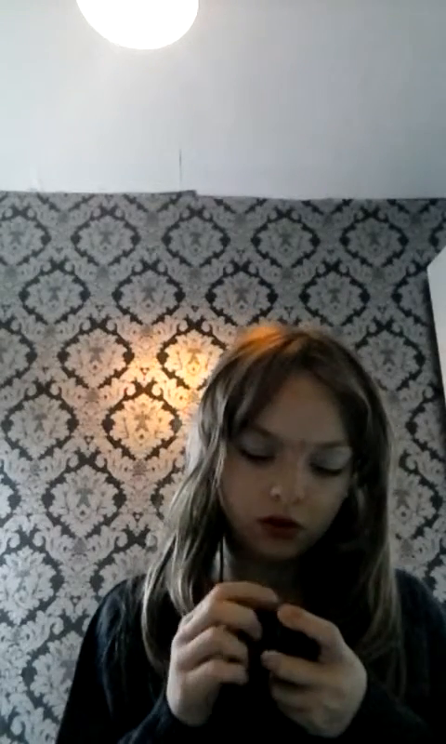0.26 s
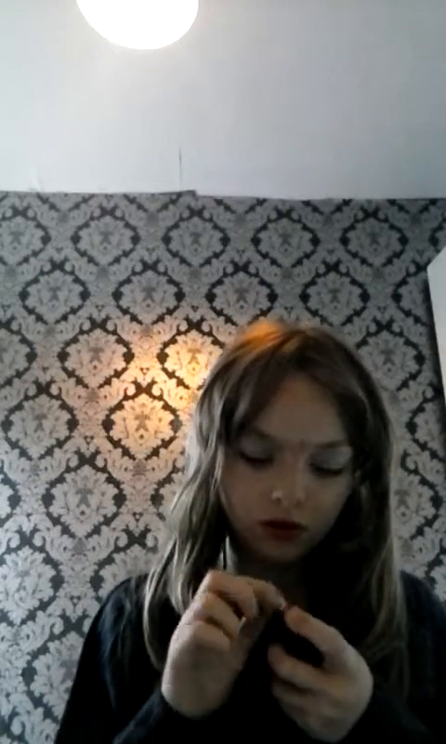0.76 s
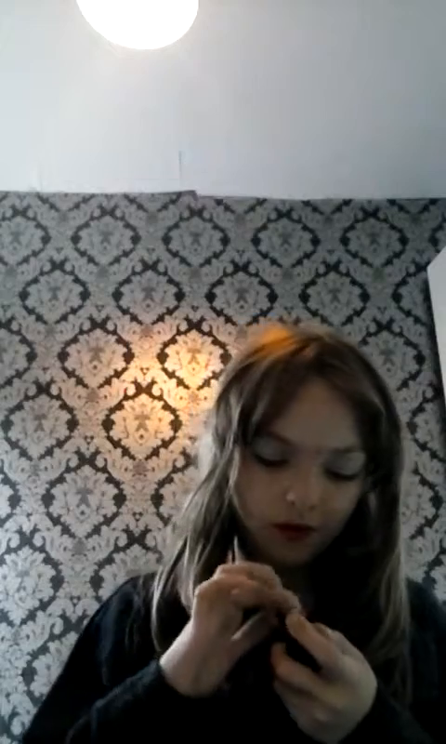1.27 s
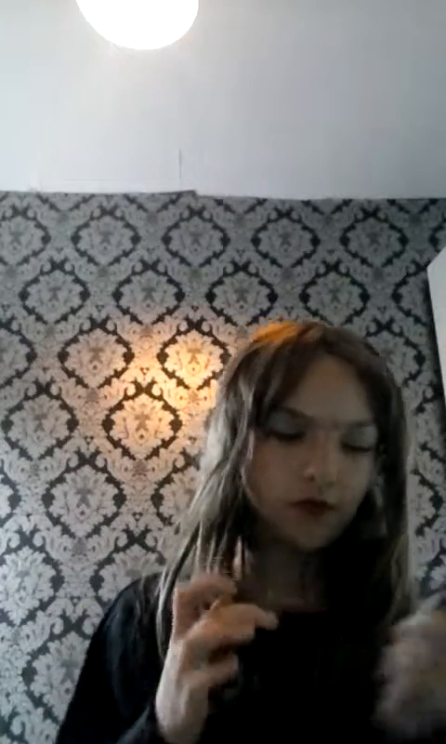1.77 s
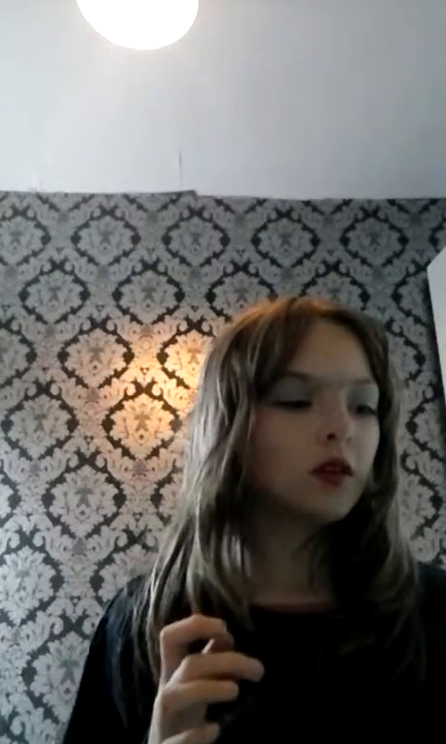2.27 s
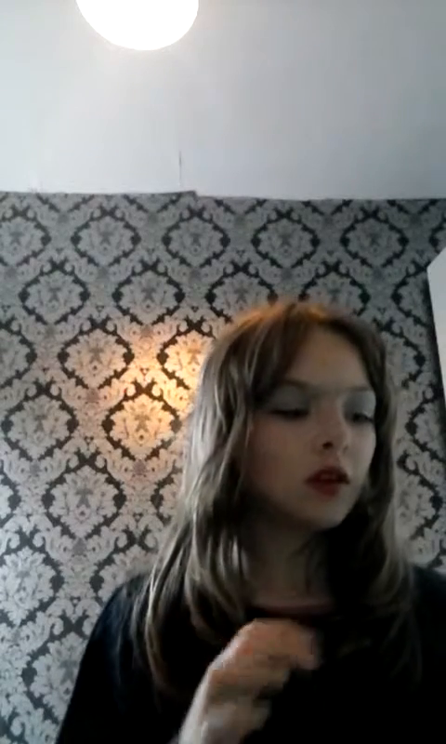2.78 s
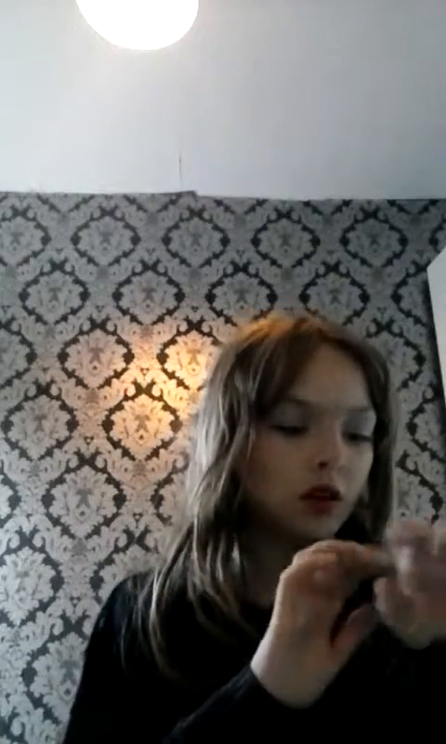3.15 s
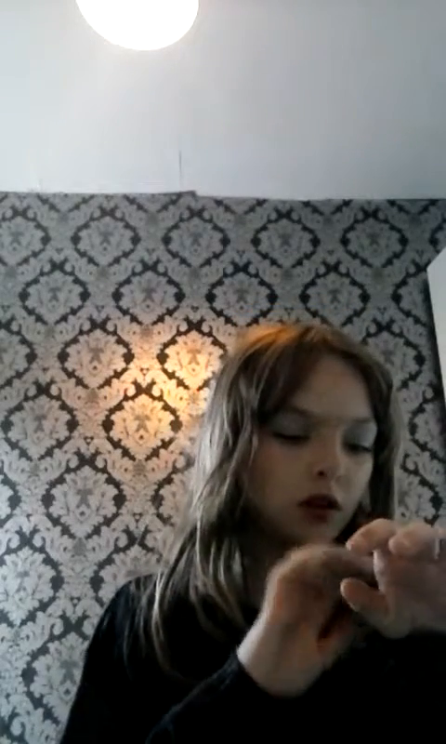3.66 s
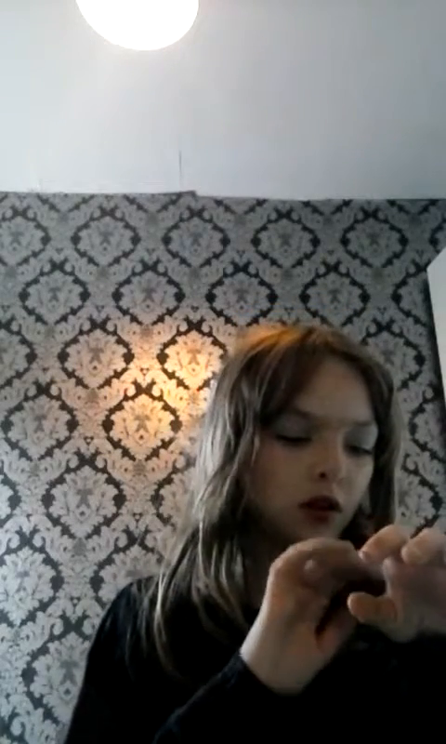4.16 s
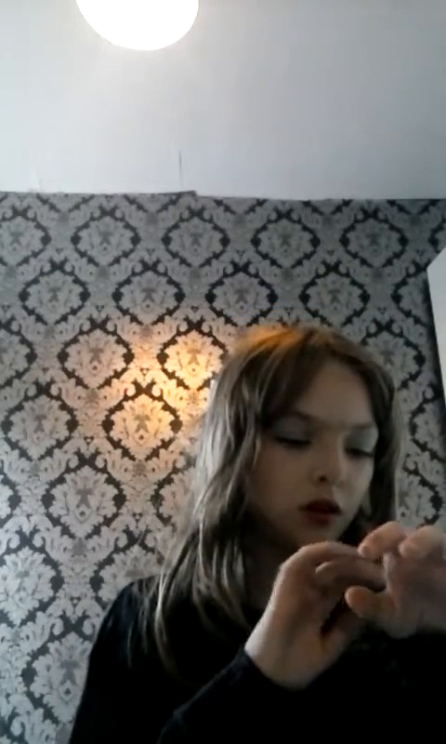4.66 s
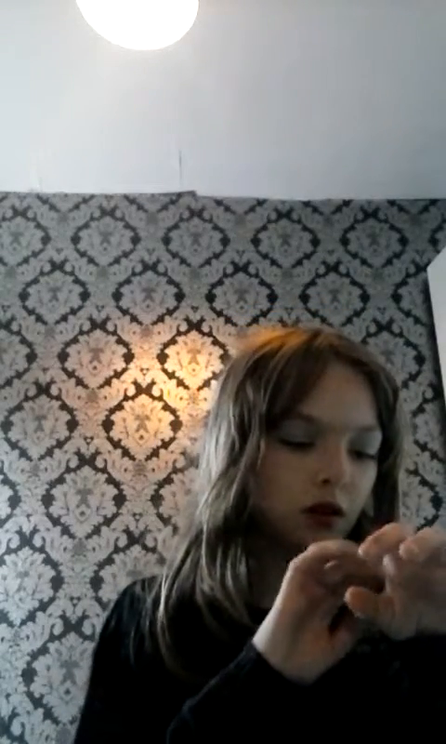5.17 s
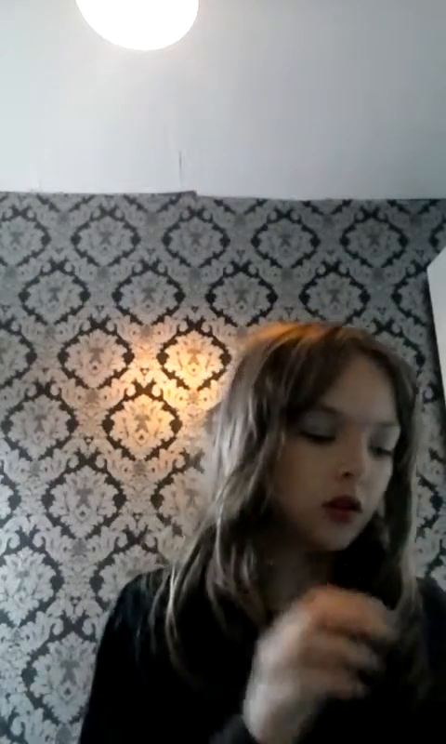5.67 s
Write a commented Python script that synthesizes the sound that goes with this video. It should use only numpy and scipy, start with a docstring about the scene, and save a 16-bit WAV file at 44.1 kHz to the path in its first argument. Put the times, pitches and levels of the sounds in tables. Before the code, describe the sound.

A girl handles a small makeup container near the microphone indoors. Mostly near-silence with wavering low hum and a thin, rapidly pulsing hiss. Just past two seconds, a bright hard crack with a woody, boxy body and brief room reflections, followed by a softer cluster of fumbling clicks, bumps and skin sliding on the table. The rest is faint hum and hiss with low rumble.

```python
"""Indoors, close to the microphone: a small hard case is put down hard on a hollow table top.
Finger swishes and a faint knock come first; soon after, a hand fumbles and picks something up.
Blows and contacts ring banks of decaying modes and excite noise reflections; the sliding hand is noise.
Underneath lie dull air noise, a wavering mains hum, low rumble swells and a treble hiss in quick bursts."""
import sys
import numpy as np
from scipy import signal
from scipy.fft import rfft, irfft
from scipy.io import wavfile

SR = 44100
rng = np.random.default_rng(int(sys.argv[2]) if len(sys.argv) > 2 else 0)


def pcm_store(signal):
    """Save signal as 16-bit PCM."""
    levels = np.round(np.clip(np.atleast_2d(signal), -1, 1) * 32767)
    wavfile.write(sys.argv[1], SR, levels.astype(np.int16).T)


N = 261954  # samples

# Modes of a hard edge, rung by the case and by the fumbling hand: (f/Hz, level/dB, t60/s)
EDGE_MODES = [(1890, -3.5, 0.008), (2270, -6.5, 0.0052), (2619, -1.5, 0.013), (3450, -3.5, 0.0055),
              (4550, -3.5, 0.0033), (4930, -11.5, 0.0018), (6470, -1, 0.0015), (7496, -8, 0.0019),
              (9087, -16, .005), (11200, -15, 0.0014)]


def from_db(db):
    """Decibels to gain."""
    return 10 ** (np.asarray(db) / 20)


def rms_one(x):
    """Scales to rms 1."""
    return x / np.sqrt(np.mean(x ** 2) + 1e-20)


def in_time(rows):
    """Columns of a curve table, interpolated at every sample."""
    s, *columns = np.transpose(rows)
    return [np.interp(np.arange(N) / SR, s, column) for column in columns]


def at_hz(points, hz):
    """A table over frequency, read on a log-frequency axis."""
    table_hz, values = np.array(points).T
    return np.interp(np.log(hz), np.log(table_hz), values)


def drift(rate_hz):
    """Slow random wander of rms about 1: noise through two equal low-pass poles at rate_hz."""
    step = 40  # samples per slow value
    r = np.exp(-2 * np.pi * step * rate_hz / SR)
    settle = 2000  # slow values dropped while the filter settles
    noise = rng.standard_normal(N // step + settle + 2)
    slow = signal.lfilter([1], [1, -2 * r, r * r], noise)[settle:]
    return np.interp(np.arange(N) / step, np.arange(len(slow)), rms_one(slow))


def band(x, low_hz, high_hz):
    """Second-order Butterworth band-pass."""
    return signal.sosfilt(signal.butter(2, [low_hz, high_hz], "band", fs=SR, output="sos"), x)


def noise_band(low_hz, high_hz):
    """Band-passed noise, rms 1."""
    return rms_one(band(rng.standard_normal(N), low_hz, high_hz))


def coloured(spectrum):
    """Noise of the given spectrum, silent outside the table's range, rms 1."""
    hz = np.maximum(np.fft.rfftfreq(N, 1 / SR), 1)
    inside = (hz >= spectrum[0][0]) & (hz <= spectrum[-1][0])
    shaped = rfft(rng.standard_normal(N)) * from_db(at_hz(spectrum, hz)) * inside
    return rms_one(irfft(shaped, N))


def soft(seconds):
    """Touch with a rounded push of this length; longer pushes excite less treble."""
    push = np.hanning(round(seconds * SR) + 2)
    return lambda clicks: signal.fftconvolve(clicks, push / push.sum())[:N]


def scuff(seconds):
    """Touch with a short drag: a noise force that falls 20 dB in this time."""
    fall = from_db(-20 * np.arange(SR // 20) / SR / seconds)
    fall = fall / np.sqrt(np.sum(fall ** 2))
    return lambda clicks: signal.fftconvolve(clicks, fall)[:N] * rng.standard_normal(N)


def struck(table, column, modes, spread_db, touch):
    """Each contact's force, shaped by touch, rings every mode as a decaying resonator, unevenly."""
    rows = np.array(table)
    at = np.round(rows[:, 0] * SR).astype(int)
    out = np.zeros(N)
    chance = rng.standard_normal((len(at), len(modes)))
    shared = np.sqrt(np.sum(from_db(np.array(modes)[:, 1]) ** 2))  # the modes share the blow
    for k, (hz, mode_db, t60) in enumerate(modes):
        clicks = np.full(N, 1e-18)  # tiny floor instead of exact zeros
        clicks[at] = -from_db(rows[:, column] + mode_db + spread_db * chance[:, k]) / shared
        r = from_db(-60 / (t60 * SR))  # decay per sample
        w = 2 * np.pi * hz / SR
        out += signal.lfilter([0, np.sin(w)], [1, -2 * r * np.cos(w), r * r], touch(clicks))
    return out


def air(air_db):
    """Dull room noise, its upper part patchy, with a few narrow bands that come and go."""
    # Spectrum of the room air: (f/Hz, relative level per Hz/dB)
    air_spectrum = [(69, -35.5), (118, -3), (124, -0.5), (277, -5.5), (364, -12), (479, -8.5), (805, -13.5),
                    (923, -15.5), (1800, -19.5), (4500, -28), (5850, -61), (9900, -120)]
    # Faint narrow bands in the air: (f/Hz, width/Hz, level against the dull noise/dB)
    air_tones = [(276, 11, -12), (487.6, 15, -13), (913, 50, -11), (1016.3, 44, -14)]
    patchy_db = 2
    patches, tones = np.zeros(N), np.zeros(N)
    for hz, width, db in air_tones:
        tones += from_db(db + 2.2 * drift(1.5)) * noise_band(hz - width / 2, hz + width / 2)
    dull = coloured(air_spectrum)
    for low in (500, 800, 1280, 2050):
        change = from_db(patchy_db * drift(2.5)) - 1
        patches += change * band(dull, low, 1.6 * low)
    return from_db(air_db + 0.4 * drift(1.5)) * (dull + patches + tones)


def hum():
    """Mains hum: one sine whose level and phase waver."""
    # Level curve of the hum before its waver: (t/s, rms level/dB)
    hum_levels = [(0, -68), (.7, -71), (1.0, -60.5), (1.55, -68), (2.1, -62.5), (3.55, -69.5), (4.2, -67.5),
                  (4.65, -71), (5.4, -66.5), (5.94, -71.5)]
    hum_hz, waver_db = 99.4, 2.5
    hum_db, = in_time(hum_levels)
    level = np.sqrt(2) * from_db(hum_db + waver_db * drift(2.04))  # rms to peak
    phase = 2 * np.pi * hum_hz * np.arange(N) / SR + 1.1 * drift(6.8)
    return level * np.sin(phase)


def rumble():
    """Lumpy swells of noise, mostly below the hum, over a steady deep floor."""
    # Swells of low rumble: (peak t/s, width between 1/e points/s, peak level before the lumps/dB)
    swell_rows = [(.62, 0.19, -74), (0.882, 0.16, -75), (1.408, .45, -69), (1.76, 0.13, -84),
                  (2.117, 0.92, -64.5), (3.176, 0.2, -52), (4.243, 0.54, -64.5), (4.764, 0.33, -67.5),
                  (5.403, 0.47, -75.5)]
    floor_db = -79
    t = np.arange(N) / SR
    swell = sum(from_db(db) * np.exp(-(2 * (t - s) / length) ** 2) for s, length, db in swell_rows)
    lumpy = swell * from_db(2 * drift(4)) * noise_band(50, 85)
    return lumpy + from_db(floor_db) * noise_band(30, 77)


def hiss(hiss_db):
    """Steady treble hiss that jumps up in short, almost regular bursts of uneven height."""
    # Spectrum of the hiss: (f/Hz, relative level per Hz/dB)
    hiss_spectrum = [(2060, -39.5), (3500, -29), (4160, -22), (5700, -14), (6560, -7.5), (8530, 0),
                     (9820, -10.5), (11200, -7), (12800, -11.5), (14200, -11), (16200, -19)]
    bursts_per_s, rate_wander, jitter_cycles = 41, .15, 0.21
    burst_s, burst_db, spread_db = .008, 5, 1.5  # height before the colouring
    per_s = bursts_per_s * (1 + rate_wander * drift(2.6))
    cycle = np.floor(np.cumsum(per_s) / SR + jitter_cycles * drift(5)).astype(int)
    starts = np.diff(cycle, prepend=0) > 0
    height = starts * from_db(burst_db + spread_db * rng.standard_normal(N))
    gate = signal.fftconvolve(height, signal.windows.tukey(round(burst_s * SR), .3))[:N]
    focused = band(gate * coloured(hiss_spectrum), 6500, 9300)
    wide = from_db(-4.0) * gate * coloured(hiss_spectrum)
    return from_db(hiss_db) * (coloured(hiss_spectrum) + focused + wide)


def swishes():
    """Faint finger swishes: narrow puffs of noise that start quickly and trail off."""
    # Puffs: (t/s, length/s, f/Hz, level at the height of the puff/dB)
    swish_rows = [(1.345, .11, 6200, -74), (1.672, .05, 5600, -71.5), (1.7, .08, 6400, -73),
                  (1.686, .014, 2600, -77), (1.9, .16, 6300, -75), (1.968, .018, 2800, -75)]
    out = np.zeros(N)
    for s, length, hz, level_db in swish_rows:
        noise = rms_one(band(rng.standard_normal(SR // 4), hz * .93, hz * 1.09))
        puff = noise[:round(length * SR)]
        along = np.linspace(0, 1, len(puff))
        swell = np.sin(np.pi * np.sqrt(along))  # fullest a quarter of the way in
        out[round(s * SR):][:len(puff)] += from_db(level_db) * puff * swell
    return out


def contacts():
    """Fumbling: each contact thuds the table top, knocks small things and ticks an edge."""
    # Contacts, drive before modes and filters: (t/s, thud level/dB, knock level/dB, edge tick level/dB)
    contact_rows = [(2.188, -83.5, -48, -64), (2.65, -58, -52.5, -80), (2.677, -41, -47, -80),
                    (2.722, -22.5, -37.5, -69), (2.746, -14, -32.5, -31), (2.749, -14.5, -17, -41.5),
                    (2.768, -46, -56, -36.5), (2.798, -60, -31.5, -40), (2.818, -48, -55, -54),
                    (2.836, -34, -55, -45), (2.853, -14, -20, -40), (2.937, -34, -47, -57),
                    (2.949, -15, -21, -40.5), (2.976, -34, -61, -51.5), (3.017, -64, -62, -45),
                    (3.028, -12, -27.5, -49.5), (3.087, -28, -34, -59), (3.099, -33, -26.5, -43.5),
                    (3.117, -18, -41, -55.5), (3.139, -48, -34, -49), (3.156, -16.5, -39.5, -57),
                    (3.172, -46, -44, -41.5), (3.207, -43, -64, -65), (3.247, -42, -48, -72)]
    # Modes of the table top: (f/Hz, level/dB, t60/s)
    thud_modes = [(109, -9, 0.055), (153.7, -11.5, 0.18), (187.2, 1, 0.083), (194, 1.5, 0.0048),
                  (242.1, -21, 0.11)]
    # Modes of the small things in the hand: (f/Hz, level/dB, t60/s)
    knock_modes = [(353, -3.5, 0.019), (444.5, -1, .02), (520, -2.5, .022), (630, -2.5, .018),
                   (730, -1, 0.03), (810, -6, 0.042), (954.5, -4.5, .014), (1218, -7, 0.031),
                   (1510, -22, 0.015)]
    tap, drag = soft(0.00034), scuff(0.0053)

    def tap_and_drag(clicks):
        """A knock is part clean tap, part drag."""
        return from_db(-3) * tap(clicks) + from_db(-3.5) * drag(clicks)

    thud = struck(contact_rows, 1, thud_modes, spread_db=3.5, touch=soft(0.00275))
    knock = struck(contact_rows, 2, knock_modes, spread_db=3.5, touch=tap_and_drag)
    tick = struck(contact_rows, 3, EDGE_MODES, spread_db=4.0, touch=scuff(0.0083))
    thud = band(band(thud, 80, 900), 110, 1500)
    knock = band(band(knock, 280, 1600), 200, 2200)
    return thud + knock + band(tick, 2300, 7800)


def crack():
    """First broadband crack of the landing: bright noise that dies within milliseconds."""
    # Crack: (t/s, starting level before the band-pass/dB, t60/s)
    crack_row = (2.3229, -8.5, 0.001625)
    s, start_db, t60 = crack_row
    t = np.arange(N) / SR - s
    fall = (t > 0) * from_db(start_db - 60 * np.maximum(t, 0) / t60)
    return band(rng.standard_normal(N) * fall, 700, 12000)


def case_landing():
    """The case lands and rebounds: furniture booms, case and shelf ring, a dragged edge ticks."""
    # Blows, drive before modes and filters: (t/s, boom level/dB, body level/dB, edge tick level/dB)
    blows = [(2.3226, -14.5, -4.5, -6.5), (2.3268, -12.5, -1.5, -13), (2.3345, -12, -4.5, -19),
             (2.343, -16.5, -14, -21), (2.381, -19, -31, -31)]
    # Modes of the furniture under the blow: (f/Hz, level/dB, t60/s)
    boom_modes = [(60.04, -7.5, 0.097), (114, -3, 0.17), (145, 2.5, 0.083), (222, -3.5, 0.0608)]
    # Modes of case and shelf: (f/Hz, level/dB, t60/s)
    body_modes = [(342, -4.5, 0.18), (407, -2.5, 0.13), (434, -21, 0.39), (468, -8, 0.19),
                  (616, 4.5, 0.086), (600, -18, 0.37), (690, -3, 0.064), (800.4, -1, 0.066),
                  (865, 9, 0.041), (966, -3, 0.18), (1041.4, -8.5, .05), (1138, -5.5, .05),
                  (1230, -7, 0.034), (1385, -11.5, 0.014), (1529.5, -9, 0.043), (1963, -9.5, 0.046)]
    boom = struck(blows, 1, boom_modes, spread_db=-2.0, touch=soft(0.0048))
    body = struck(blows, 2, body_modes, spread_db=4.0, touch=soft(.0003))
    tick = struck(blows, 3, EDGE_MODES, spread_db=-1.0, touch=scuff(.012))
    return band(boom, 43, 875) + band(body, 260, 2000) + band(tick, 1000, 15000) + crack()


def room(x):
    """Dense reflections: half-octave bands of noise, each dying at its own rate."""
    # Decay of the room: (f/Hz, t60/s)
    room_decay = [(100, 0.2), (260, 0.31), (600, 0.26), (1100, 0.28), (2000, 0.21), (4000, 0.29),
                  (7000, .16), (12800, .08)]
    rise_s = 0.00081
    t = np.arange(SR // 2) / SR
    edges = 90 * 2 ** np.arange(0, 7.6, .5)
    tail = np.zeros(len(t))
    for low, high in zip(edges, edges[1:]):
        t60 = at_hz(room_decay, np.sqrt(low * high))
        tail += band(rng.standard_normal(len(t)), low, high) * from_db(-60 * t / t60)
    tail *= 1 - np.exp(-t / rise_s)
    return signal.fftconvolve(x, tail / np.sqrt(np.sum(tail ** 2)))[:N]


def rustle():
    """Lumpy noise of skin and cloth sliding on the table: fades in, presses harder, lifts off."""
    start_s, full_s, lift_s, end_s = 2.64, 2.75, 3.202, 3.393
    low_db, mid_db = -52.5, -66.5  # before fades, push and lumps
    press_db, edge_db = 11, -21.5  # rise until the lift, fade at both ends
    shape_db, push_db = in_time([(start_s - .02, -80, 0), (start_s, edge_db, 0), (full_s, 0, 0),
                                 (lift_s, 0, press_db), (end_s, edge_db, 0), (end_s + .03, -80, 0)])
    lumps_db = 2.5 * drift(30)
    low = from_db(low_db + shape_db + push_db + lumps_db) * noise_band(110, 210)
    mid_noise = rms_one(band(band(rng.standard_normal(N), 250, 900), 200, 1100))
    mid = from_db(mid_db + shape_db + 0.28 * push_db + lumps_db) * mid_noise
    return low + mid


def scene():
    """Landing, contacts and their reflections, with rustle and swishes, over the quiet background."""
    # Level curves of the background: (t/s, air level/dB, steady hiss level/dB)
    background_levels = [(0, -71.5, -67), (.5, -71, -70), (1.1, -71.5, -70.5), (2.03, -69.5, -67.5),
                         (2.3, -68.5, -71), (3.5, -72.5, -70), (4.1, -73, -73.5), (4.5, -71.5, -71),
                         (4.75, -73, -73), (5.05, -71, -71), (5.94, -71.5, -71.5)]
    air_db, hiss_db = in_time(background_levels)
    # the whole background sinks gradually from the start, then comes back at once
    dip_at_s, recover_s = 0.425, 0.036
    dip_db, = in_time([(0, 0), (dip_at_s, -6.5), (dip_at_s + recover_s, 0)])
    landing, fumbling = case_landing(), contacts()
    reflections = room(from_db(-15.5) * landing + from_db(-14.5) * fumbling)
    quiet = from_db(dip_db) * (air(air_db) + hum() + rumble() + hiss(hiss_db))
    return (landing + fumbling + reflections + rustle() + swishes() + quiet)[None]


def record(dry):
    """Smooth saturation flattens the loudest peaks; a steep low-pass cuts the top."""
    ceiling, cutoff_hz = .74, 16150
    flat = dry / (1 + np.abs(dry / ceiling) ** 4) ** .25
    return signal.sosfilt(signal.ellip(12, .3, 70, cutoff_hz, fs=SR, output="sos"), flat)


dry = scene()
out = record(dry)
pcm_store(out)
```